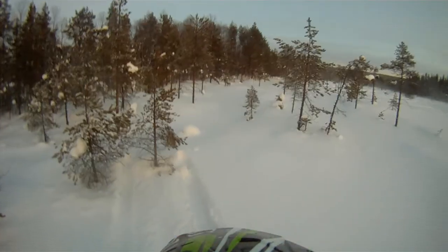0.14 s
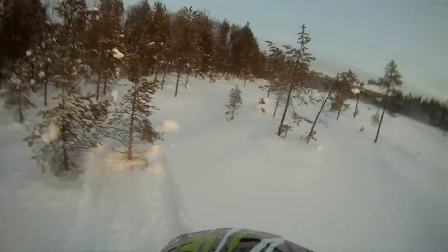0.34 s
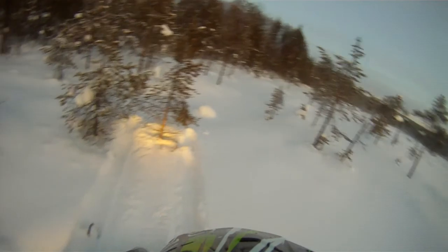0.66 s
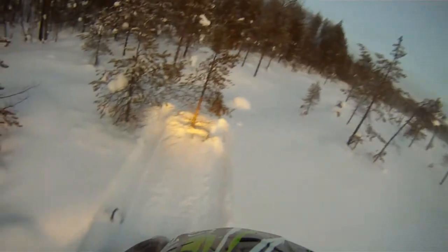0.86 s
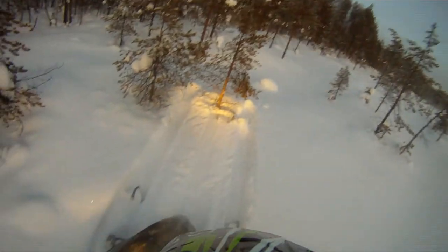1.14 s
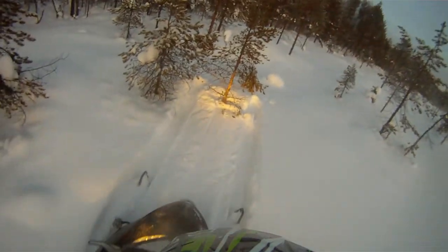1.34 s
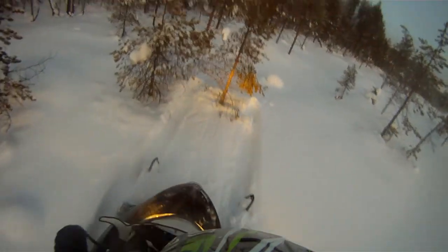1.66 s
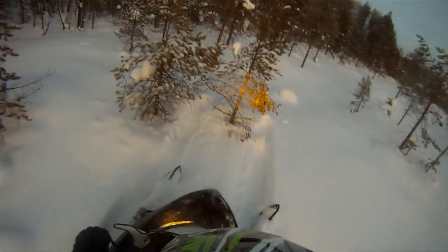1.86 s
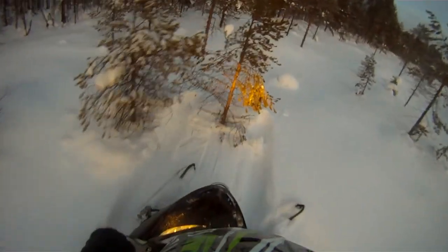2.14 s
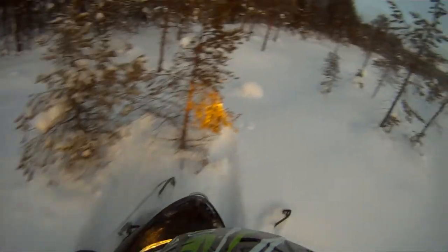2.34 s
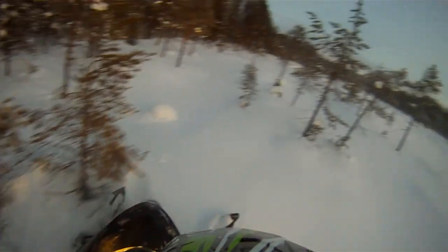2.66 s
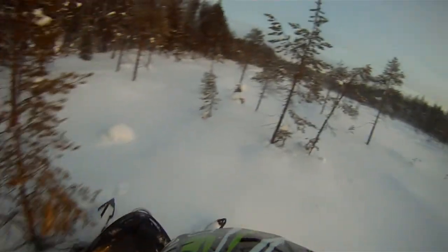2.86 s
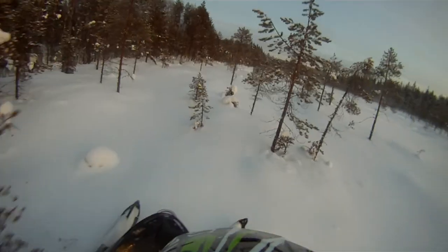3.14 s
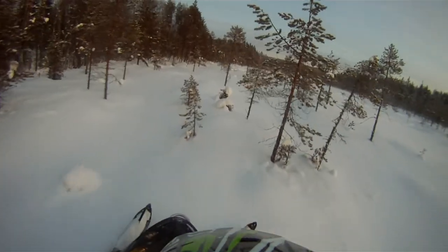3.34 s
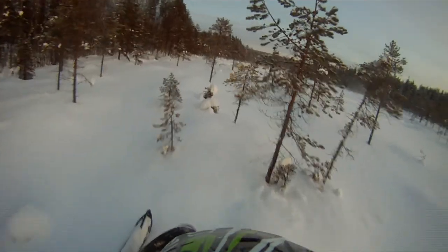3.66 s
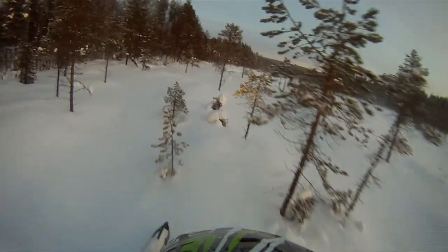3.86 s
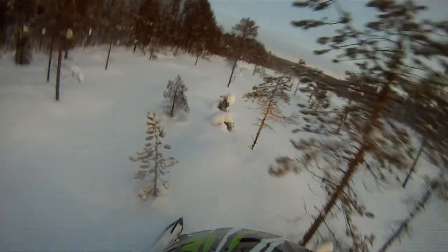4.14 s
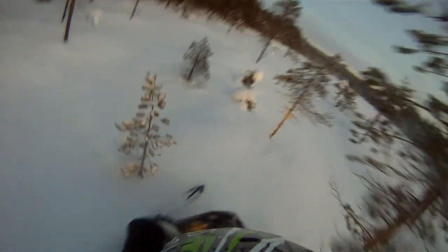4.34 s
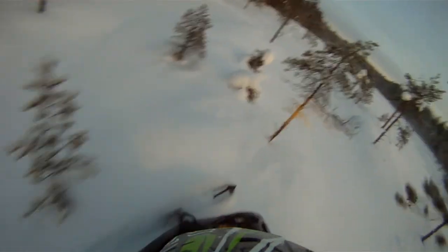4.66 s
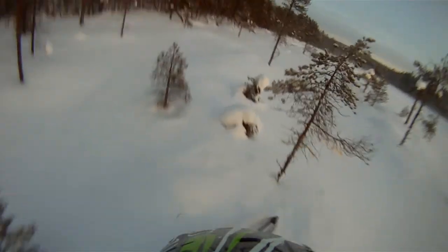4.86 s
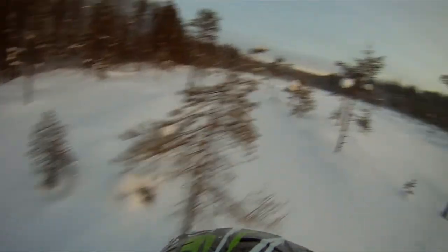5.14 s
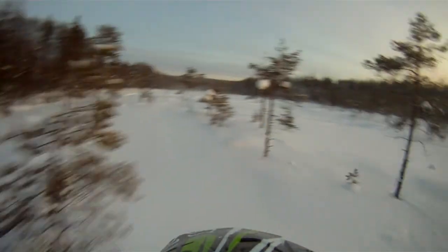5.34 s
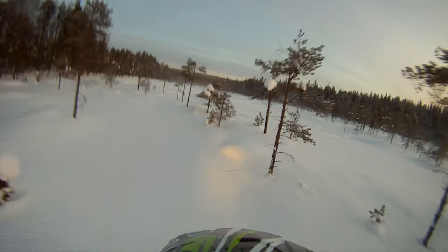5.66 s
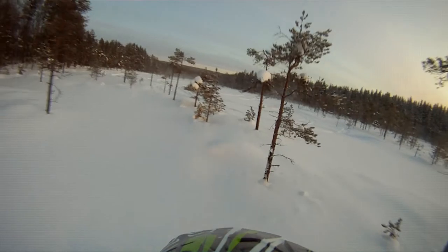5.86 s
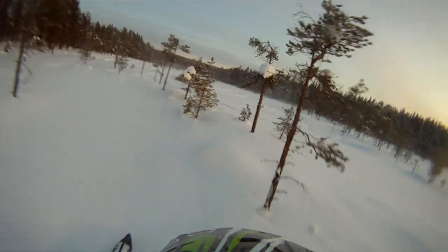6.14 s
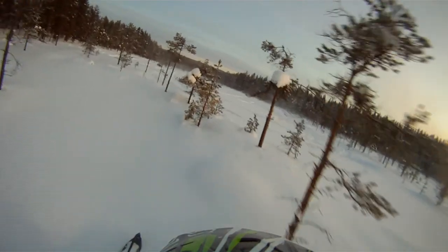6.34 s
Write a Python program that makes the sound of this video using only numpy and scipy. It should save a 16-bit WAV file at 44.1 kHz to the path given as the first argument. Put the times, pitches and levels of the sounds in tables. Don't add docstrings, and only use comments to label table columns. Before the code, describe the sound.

Heard from the rider's helmet outdoors on snow, a small two-cylinder engine sputters near idle, ticks, and pulls up to a high nasal whine with hissing exhaust. It peaks, eases back, and then a twiggy scrape ends in a loud sharp knock. Quick throttle blips follow to the end. The enclosed microphone gives a narrow, hollow, metallic tone with coarse digital edges over faint low rumble.

```python
import sys
import numpy as np
from scipy import signal
from scipy.io import wavfile

SR = 44100
rng = np.random.default_rng(int(sys.argv[2]) if len(sys.argv) > 2 else 0)


def invert_db(level):
    return 10 ** (np.asarray(level, dtype=float) / 20)


def materialize(psi):
    bounded = np.clip(np.atleast_2d(psi).T, -1, 1)
    quanta = np.round(bounded * 32767).astype(np.int16)
    wavfile.write(sys.argv[1], SR, quanta)


N = 287091

# (time [s], firing rate [firings/s])
THROTTLE_MOVES = [(0.0, 38.6), (0.09, 44.5), (0.278, 63.6), (0.507, 87.1), (0.812, 113.4), (0.953, 152.9),
                  (1.155, 110.4), (1.234, 142.3), (1.886, 120.4), (2.158, 164.2), (2.505, 197.0),
                  (2.703, 193.1), (2.864, 218.5), (3.054, 188.3), (3.199, 212.9), (3.395, 182.4),
                  (3.51, 189.6), (3.763, 138.8), (3.97, 119.7), (4.348, 133.8), (4.712, 165.0),
                  (4.898, 146.0), (5.15, 169.7), (5.349, 112.7), (5.48, 158.0), (5.63, 174.9),
                  (5.827, 115.7), (5.93, 159.5), (6.086, 117.2), (6.231, 155.5)]
# (firing tone [dB], roar [dB])
ENGINE_EFFORT = [(-78, -49), (-75, -41.5), (-57, -35.5), (-56.5, -39.5), (-48.5, -38), (-50, -32.5),
                 (-61, -33), (-46, -35), (-48, -34.5), (-38.5, -29), (-34, -27.5), (-36.5, -28),
                 (-38.5, -26), (-38, -27.5), (-37.5, -25.5), (-39.5, -28), (-35.5, -29), (-50, -31.5),
                 (-47.5, -35.5), (-45, -35.5), (-42, -31), (-43.5, -34), (-44, -29.5), (-49.5, -35.5),
                 (-41, -34.5), (-44.5, -28.5), (-51, -33), (-43, -34), (-52.5, -33.5), (-46, -34)]
# (crank order [per turn], level over the third tone [dB])
WEAK_ORDERS = [
    (1, -7),
    (3, -2),
    (5, -4.5),
    (7, -2.5),
    (8, -7.5),
    (9, -7),
    (10, -6),
    (11, -13),
]
# (crank order [per turn], resonance [Hz], half width [Hz], level over the roar [dB])
SINGING_ORDERS = [(8, 750, 50, -18), (12, 1175, 65, -5), (13, 1250, 50, -12), (14, 1130, 50, -15),
                  (16, 1130, 25, -8), (16, 1290, 60, -11), (17, 1330, 40, -14), (17, 1745, 30, -9),
                  (18, 1730, 25, -11), (21, 1485, 22, -8), (24, 1697, 25, -5), (24, 1975, 80, -4),
                  (28, 1980, 25, -6), (32, 2400, 35, -11), (39, 3050, 60, -8)]
# (time [s], peak level [dB], time to fade by 60 dB [s])
IDLE_POPS = [(0.1068, -62, 0.06), (0.1218, -49, 0.042), (0.141, -34, 0.036), (0.1714, -36.5, 0.041),
             (0.2047, -39, 0.045), (0.229, -40, 0.045), (0.2555, -36, 0.037), (0.2774, -37, 0.044),
             (0.3047, -36, 0.05), (0.4001, -49, 0.097), (0.4929, -44, 0.048), (0.523, -29.5, 0.022),
             (0.628, -40, 0.044), (0.68, -38, 0.045), (0.7293, -31.5, 0.043), (0.7818, -49, 0.06),
             (0.8162, -44, 0.067), (0.831, -34, 0.061), (0.8985, -42, 0.055)]
# (time [s], lugs per firing [ratio], level [dB])
TRACK_LUGS = [
    (2.6, .57, -73),
    (2.724, .583, -55),
    (2.792, .651, -43.5),
    (3.064, .69, -46.5),
    (3.25, .683, -46),
    (3.422, .716, -46.5),
    (3.6, .689, -47.5),
    (3.864, .70, -51),
    (4.04, .648, -58),
]
# (time [s], level [dB])
BRANCH_RUB = [
    (4.546, -45),
    (4.556, -27),
    (4.59, -22),
    (4.625, -21.5),
    (4.637, -30),
    (4.645, -26),
    (4.663, -31),
    (4.679, -35),
    (4.683, -60),
]
# (time [s], peak level [dB], time to fade by 60 dB [s])
BRANCH_CATCHES = [(4.558, -11, .05), (4.569, -8, .045), (4.576, -12, .04), (4.586, -13, .05),
                  (4.601, -12, .05), (4.61, -14, .05), (4.621, -11, .06), (4.6405, -4, .03),
                  (4.652, -12, .03), (4.657, -11, .03), (4.6672, 7, .028), (4.6705, 2, .025),
                  (4.675, -8, .025)]
# (time [s], peak level [dB], time to fade by 60 dB [s])
SHELL_TICKS = [(0.142, -42, 0.03), (0.3057, -37, 0.015), (0.4534, -40, 0.03), (0.4938, -37, 0.03),
               (0.5237, -34, 0.038), (0.5591, -38, 0.03), (0.5846, -38, 0.04), (0.615, -36, 0.04),
               (0.729, -36, 0.034), (0.883, -34.5, 0.03), (1.1841, -15, 0.045), (1.19, -26, 0.03),
               (4.7197, -33, 0.03), (4.7875, -29, 0.03), (4.8294, -27, 0.02), (4.844, -24, 0.025),
               (5.0055, -29, 0.026), (5.015, -33, 0.027), (5.5025, -32, 0.03), (5.658, -34.5, 0.03)]
# (frequency [Hz], width [Hz], boost or cut [dB])
HOUSING_RINGS = [(563, 41, 12.5), (942, 198, 9), (1088, 92, -19.5), (1184, 124, 11.5), (1306, 14, 10.5),
                 (1525, 124, 8), (1660, 76, 8.5), (1971, 204, 9), (2304, 85, 4.5), (2463, 68, 7.5),
                 (2675, 57, 7), (3025, 290, 5.5), (3457, 66, 8.5), (4980, 830, 3),
                 (1685, 40, 6),
    (1980, 45, 4),
    (3070, 80, 3),
]
# (frequency [Hz], level [dB], time to fade by 60 dB [s])
MOUNT_HUMS = [
    (62.5, -6, .5),
    (186, -13, .2),
    (523, -20, .12),
]
# (time [s], peak level [dB])
MOUNT_BUMPS = [(0.034, -32.5), (0.233, -53), (0.513, -33), (1.19, -34), (1.248, -31.5), (1.92, -43),
               (2.12, -41), (2.638, -39), (3.849, -51), (4.029, -36), (4.567, -20), (4.597, -40),
               (4.636, -8), (4.661, -8.5), (4.983, -35), (5.669, -49), (5.99, -48)]

CLEAR_DB = -6
MISFIRE_BELOW_DB = -45
GAS_S = 0.04


def rms_one(x):
    return x / np.sqrt(np.mean(x ** 2) + 1e-20)


def in_time(rows, **ends):
    s, *columns = np.transpose(rows)
    return [np.interp(np.arange(N) / SR, s, column, **ends) for column in columns]


def drift(rate):
    r = np.exp(-80 * np.pi * rate / SR)
    slow = signal.lfilter([1], [1, -2 * r, r * r], rng.standard_normal(N // 40 + 2002))
    slow = slow[2000:]
    return np.interp(np.arange(N) / 40, np.arange(len(slow)), rms_one(slow))


def passed(x, hz, kind, order=2):
    return signal.sosfilt(signal.butter(order, hz, kind, fs=SR, output="sos"), x)


def noise_band(low_hz, high_hz, order=2):
    return rms_one(passed(rng.standard_normal(N), [low_hz, high_hz], "band", order))


def housing(x):
    for hz, width_hz, db in HOUSING_RINGS:
        g = invert_db(db / 2)
        a = np.pi * width_hz / SR
        c = -2 * np.cos(2 * np.pi * hz / SR)
        x = signal.lfilter([1 + a * g, c, 1 - a * g], [1 + a / g, c, 1 - a / g], x)
    return x


def blows(events, low_hz, high_hz, gain_db, rise_s, snap=0):
    white, force = rng.standard_normal(N), np.zeros(N)
    for s, db, t60 in events:
        i = round(s * SR)
        after = np.arange(min(N - i, round(.08 * SR))) / SR
        fade_db = -60 * after / np.clip(t60, .005, .1)
        envelope = invert_db(db + gain_db + fade_db) * np.tanh(after / rise_s)
        force[i:i + len(after)] += envelope * white[i:i + len(after)]
        force[i] += snap * invert_db(db + gain_db)
    both = np.array([white, force + 1e-18])
    steady, struck = housing(passed(both, [low_hz, high_hz], "band"))
    return struck / np.std(steady)


def follow(column, lag_s):
    rows = np.hstack([THROTTLE_MOVES, ENGINE_EFFORT])
    held = rows[np.searchsorted(rows[1:, 0], np.arange(N) / SR), column]
    r = np.exp(-1 / (lag_s * SR))
    return held[0] + signal.lfilter([(1 - r) ** 2], [1, -2 * r, r * r], held - held[0])


def controls():
    firing = follow(column=1, lag_s=0.0839)
    tone_db, roar_db = follow(column=2, lag_s=GAS_S), follow(column=3, lag_s=GAS_S)
    full_pull = 5.9
    pull = np.tanh((follow(column=1, lag_s=GAS_S) - firing) / full_pull)
    clear_db = CLEAR_DB - 1.5 * np.maximum(MISFIRE_BELOW_DB - tone_db, 0)
    return firing, pull, tone_db, roar_db, clear_db


def wavering(order, crank, level_db, waver_db, rate=5):
    level = invert_db(level_db + 3 + waver_db * drift(rate))
    return level * np.sin(order * crank + rng.uniform(0, 2 * np.pi))


def firing_tones(firing, crank, pull, tone_db, clear_db):
    pipe_db = 9 * np.exp(-((2 * firing - 308) / 28) ** 2)
    second_db = tone_db - 14.5 + 4 * pull + pipe_db
    third_db = -59 + 0.39 * (tone_db - MISFIRE_BELOW_DB)
    low = wavering(2, crank, tone_db, waver_db=1.1)
    low += wavering(4, crank, second_db, waver_db=1.5)
    low += wavering(6, crank, third_db, waver_db=4.5)
    for order, db in WEAK_ORDERS:
        low += wavering(order, crank, third_db + db + 0.32 * clear_db, waver_db=6.0)
    return low


def exhaust_roar(firing, crank, roar_db, clear_db):
    lines = 0
    for order in range(13, 41):
        cylinder_db = -2.5 * (order % 2)
        lines = lines + wavering(order, crank, cylinder_db - order / 6, waver_db=3.6, rate=8)
    firings = crank / np.pi
    since_firing = (firings % 1) / firing
    strength = invert_db(2.7 * rng.standard_normal(int(firings[-1]) + 1))[firings.astype(int)]
    steady = np.minimum(firing / 130, 1) ** 1.5
    hiss = rng.standard_normal(N) * (steady + strength * np.exp(-since_firing / .009))
    bright = invert_db(clear_db - 1) * rms_one(lines) + rms_one(hiss)
    bright = passed(bright, 847, "high", order=3)
    bright = passed(passed(bright, 3184, "low"), 4900, "low", order=3)
    rasp_db = -17 + 0.1319 * (follow(column=1, lag_s=0.11) - 150)
    fresh_hiss = hiss * rng.choice([-1, 1], N)
    bright += invert_db(rasp_db) * passed(fresh_hiss, [3700, 5450], "band", order=3)
    dull = invert_db(-10.5) * passed(hiss, [150, 1000], "band", order=1)
    return invert_db(roar_db) * rms_one(housing(bright + dull))


def faint_hiss():
    return invert_db(-59.0) * rms_one(housing(noise_band(900, 3600)))


def whine(firing, crank, roar_db, clear_db):
    out = 0
    for order, hz, width_hz, db in SINGING_ORDERS:
        ring = np.exp(-((order * firing / 2 - hz) / width_hz) ** 4)
        level_db = roar_db + db + 3.2 + 1.1 * (clear_db - CLEAR_DB) + 2.0 * drift(9)
        out = out + ring * invert_db(level_db) * np.sin(order * crank)
    return out


def sputter():
    return housing(blows(IDLE_POPS, low_hz=1450, high_hz=2900, gain_db=-7, rise_s=.003))


def track(firing):
    ratio, _ = in_time(TRACK_LUGS)
    _, db = in_time(TRACK_LUGS, left=-88, right=-90)
    return invert_db(db + 2 + 3.4 * drift(8.2)) * np.sin(2 * np.pi * np.cumsum(ratio * firing) / SR)


def branch():
    db, = in_time(BRANCH_RUB, left=-120, right=-120)
    rough = invert_db(db + 2.5 * drift(120))
    rub = rms_one(housing(noise_band(1300, 3000, order=3)))
    boom = invert_db(-12) * noise_band(495, 560)
    thud = invert_db(-16.5) * noise_band(150, 230)
    rasp = invert_db(-15.0) * noise_band(4000, 4350, order=1)
    catches = blows(BRANCH_CATCHES, low_hz=1500, high_hz=3500, gain_db=-6.5, rise_s=.0005, snap=5)
    return rough * (rub + boom + thud + rasp) + catches


def shell_ticks():
    taps = blows(SHELL_TICKS, low_hz=1590, high_hz=4000, gain_db=-8, rise_s=0.001, snap=3.0)
    pings = blows(SHELL_TICKS, low_hz=4600, high_hz=5200, gain_db=-13, rise_s=0.0018)
    return taps + pings


def mount(roar_db):
    branch_db, = in_time(BRANCH_RUB, left=-120, right=-120)
    shaking = invert_db(roar_db * 0.36 - 78 + 4.8 * drift(6.7)) + invert_db(branch_db - 47)
    push, out = np.zeros(N), 0
    for s, db in MOUNT_BUMPS:
        push[round(s * SR)] = invert_db(db)
    push = passed(push, 390, "low") + shaking * rng.standard_normal(N)
    for hz, db, t60 in MOUNT_HUMS:
        r, w = invert_db(-60 / (t60 * SR)), 2 * np.pi * hz / SR
        out = out + signal.lfilter([0, invert_db(db) * np.sin(w)], [1, -2 * r * np.cos(w), r * r], push)
    return passed(passed(out, 700, "low"), 48, "high")


def wind_and_snow():
    wind = noise_band(50, 110, order=3) * invert_db(-63 + 3.5 * drift(2.5))
    snow = noise_band(150, 480) * invert_db(-64 + 2.5 * drift(4))
    return passed(wind + snow, 48, "high")


def scene():
    firing, pull, tone_db, roar_db, clear_db = controls()
    crank = np.pi * np.cumsum(firing) / SR
    mix = firing_tones(firing, crank, pull, tone_db, clear_db)
    mix += exhaust_roar(firing, crank, roar_db, clear_db) + faint_hiss()
    mix += whine(firing, crank, roar_db, clear_db) + sputter() + track(firing)
    mix += branch() + shell_ticks() + mount(roar_db) + wind_and_snow()
    return mix[None]


def low_pass(x):
    return signal.sosfilt(signal.butter(12, 16300, fs=SR, output="sos"), x)


def record(dry):
    level_db = 20 * np.log10(np.abs(dry[0]) + 1e-9)
    fall_db = 260 * np.arange(N) / SR
    peak_db = np.maximum.accumulate(level_db + fall_db) - fall_db
    over_db = np.maximum(peak_db + 10.5, 0)
    lag = np.exp(-1 / (0.008 * SR))
    duck_db = -.7 * signal.lfilter([1 - lag], [1, -lag], over_db)
    x = np.clip(dry[0] * invert_db(duck_db), -.98, .98)
    slow = signal.resample_poly(x, 40, 147)
    held = signal.resample_poly(np.repeat(slow, 4), 147, 160)[:N]
    held = np.pad(held, (0, N - len(held)))
    steep = signal.cheby2(18, 25, 15480, fs=SR, output="sos")
    finished = signal.sosfiltfilt(steep, held)
    return low_pass(finished[None])


dry = scene()
out = record(dry)
materialize(out)
```